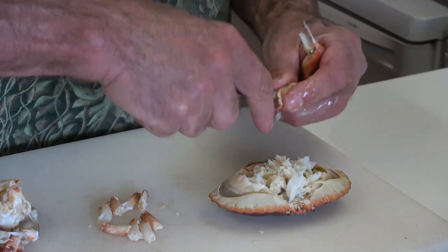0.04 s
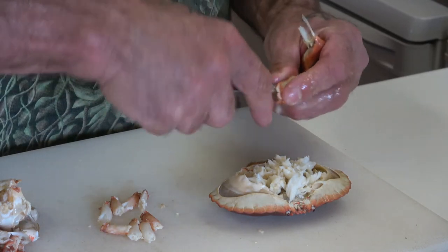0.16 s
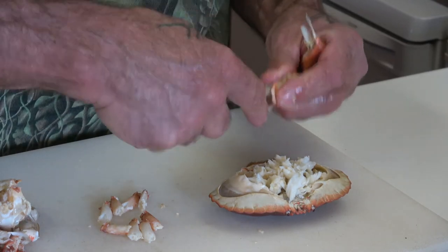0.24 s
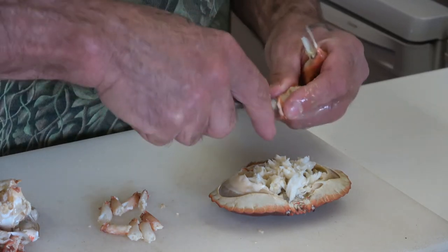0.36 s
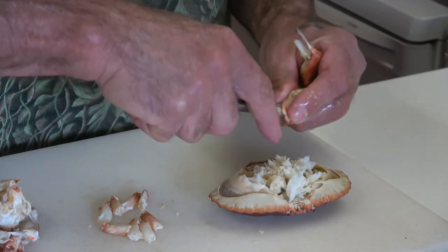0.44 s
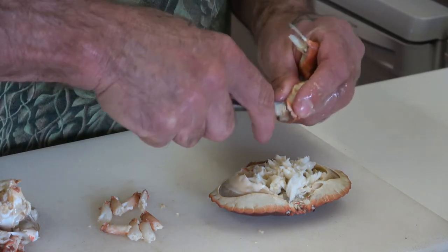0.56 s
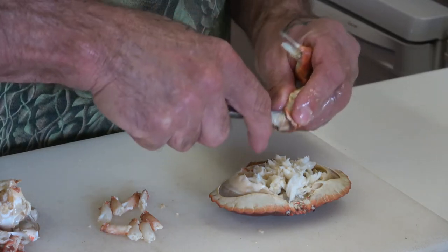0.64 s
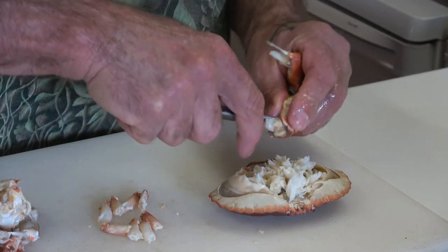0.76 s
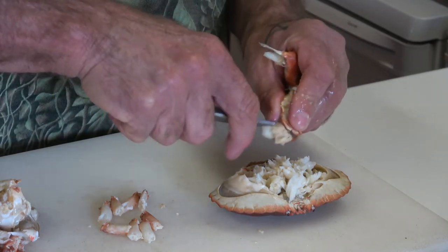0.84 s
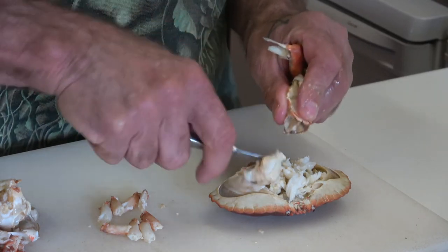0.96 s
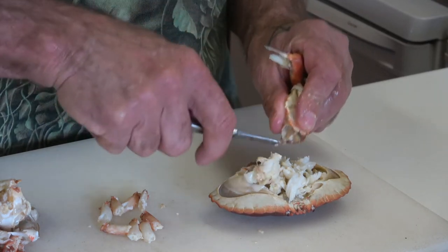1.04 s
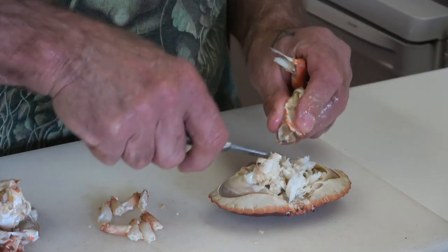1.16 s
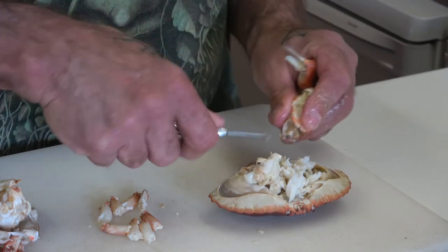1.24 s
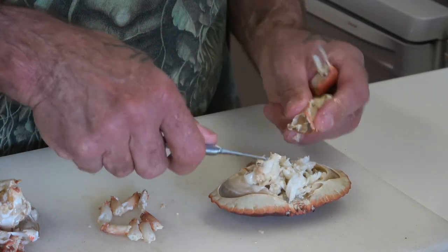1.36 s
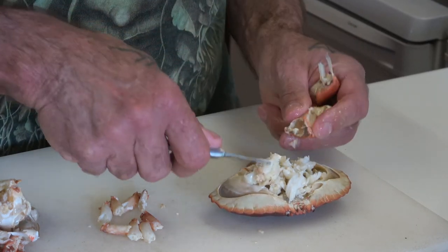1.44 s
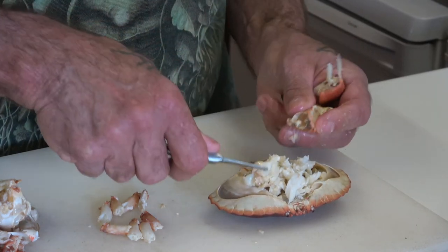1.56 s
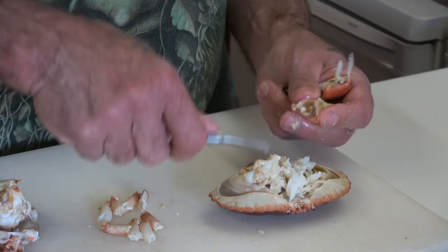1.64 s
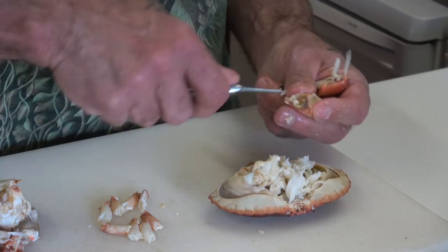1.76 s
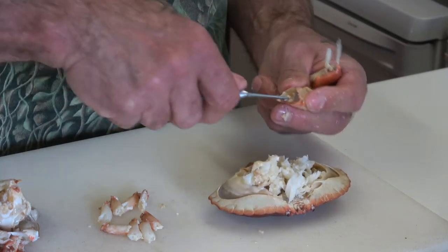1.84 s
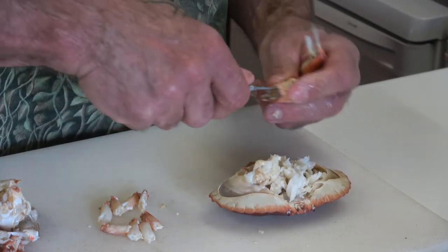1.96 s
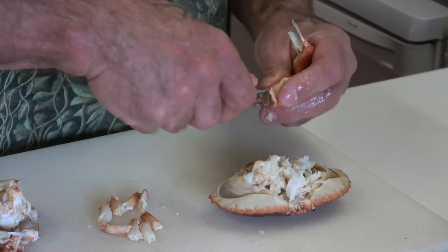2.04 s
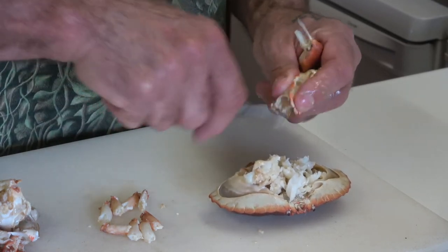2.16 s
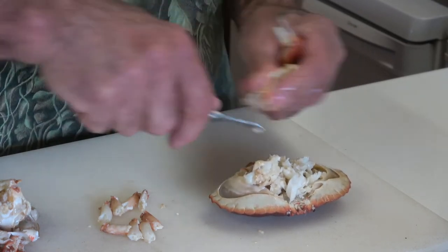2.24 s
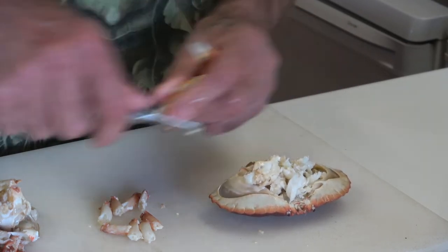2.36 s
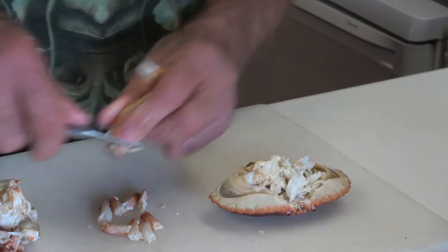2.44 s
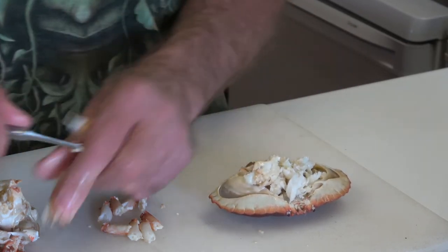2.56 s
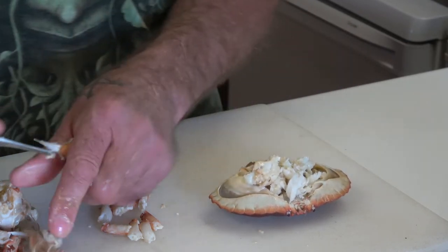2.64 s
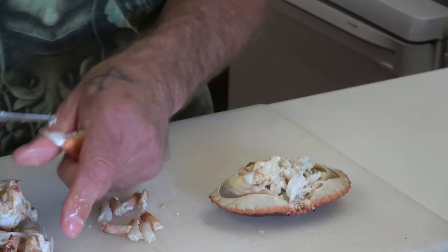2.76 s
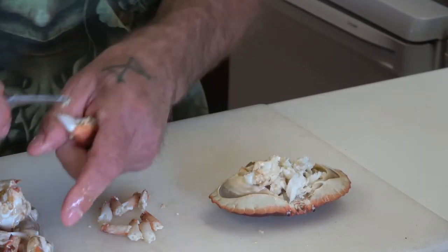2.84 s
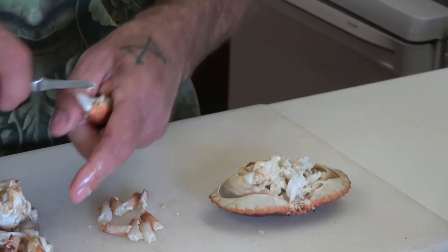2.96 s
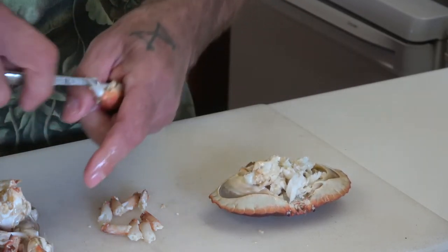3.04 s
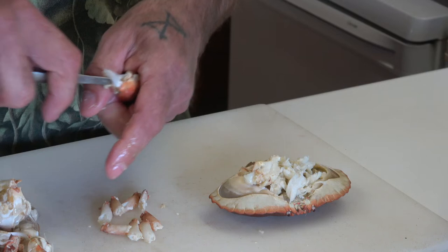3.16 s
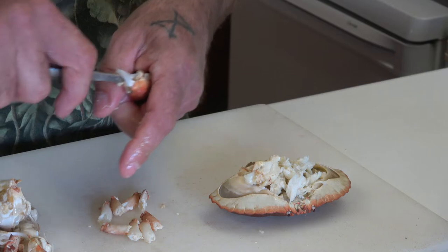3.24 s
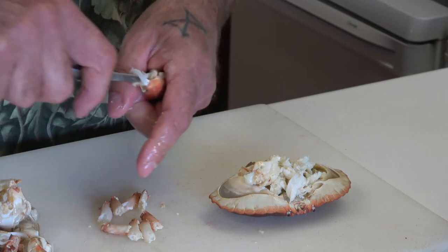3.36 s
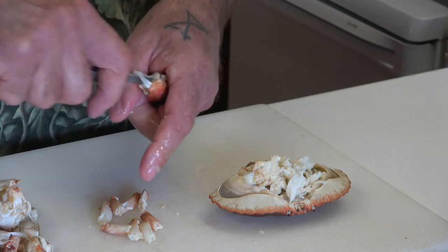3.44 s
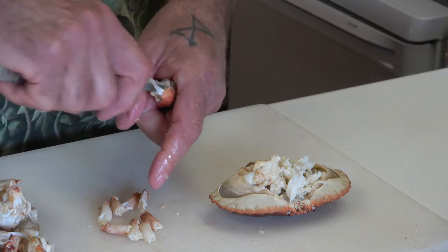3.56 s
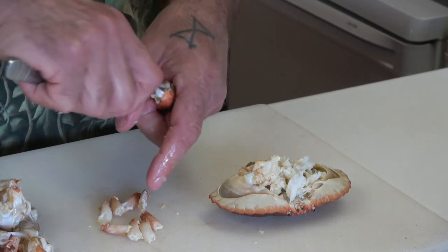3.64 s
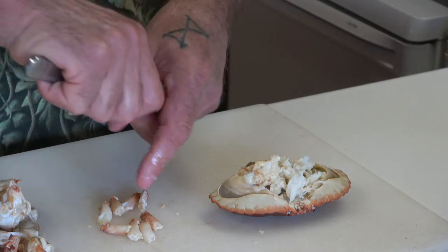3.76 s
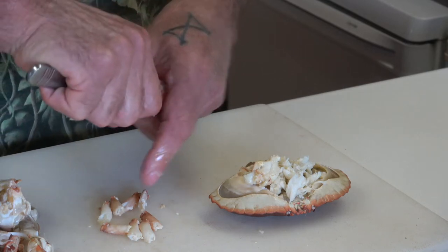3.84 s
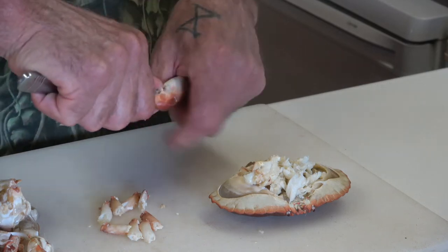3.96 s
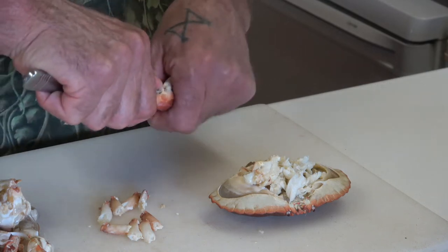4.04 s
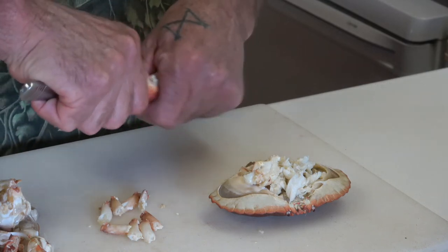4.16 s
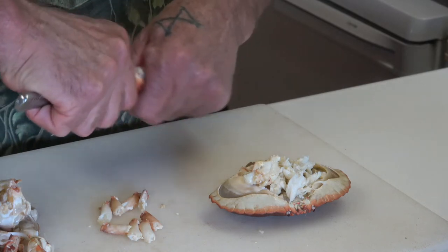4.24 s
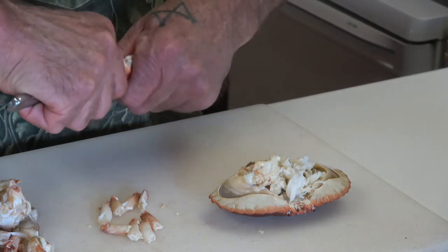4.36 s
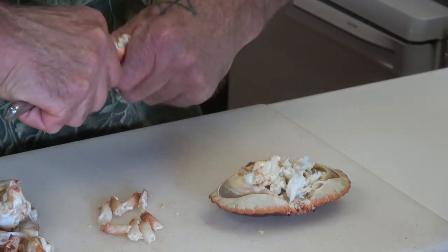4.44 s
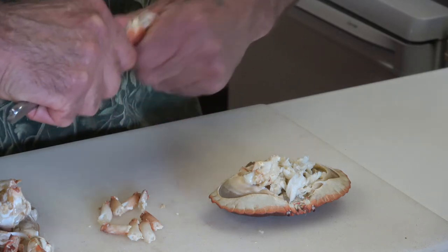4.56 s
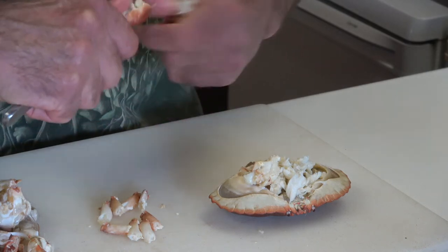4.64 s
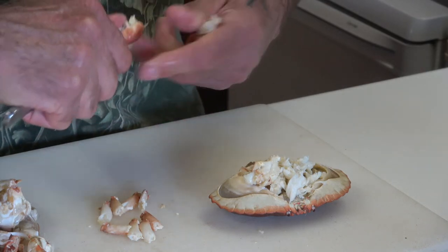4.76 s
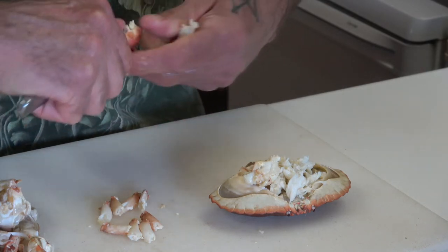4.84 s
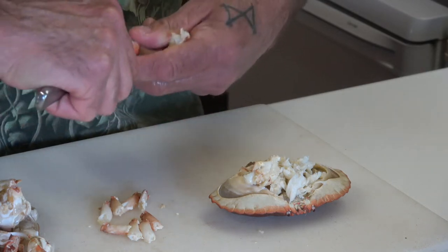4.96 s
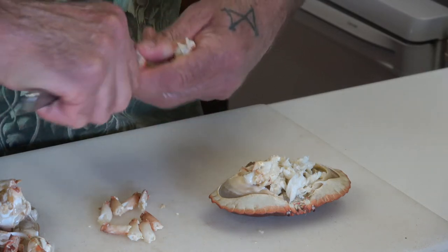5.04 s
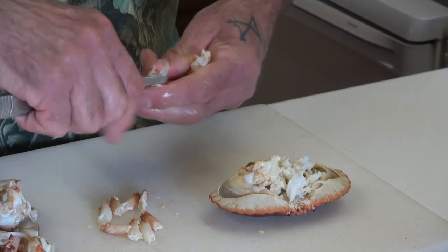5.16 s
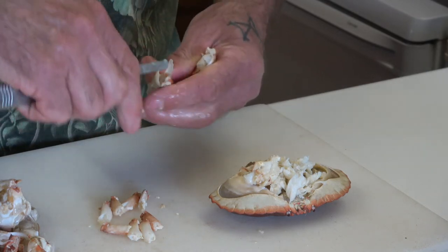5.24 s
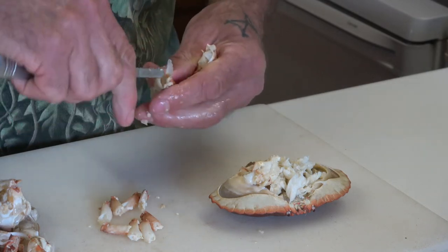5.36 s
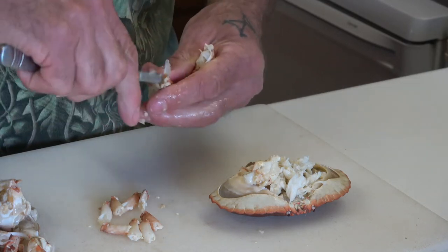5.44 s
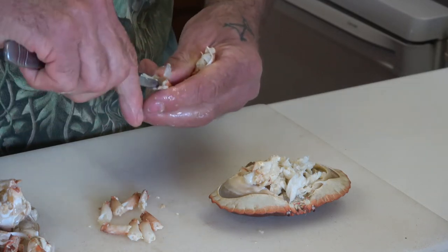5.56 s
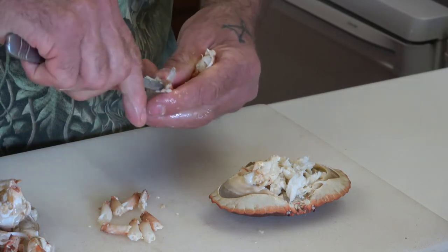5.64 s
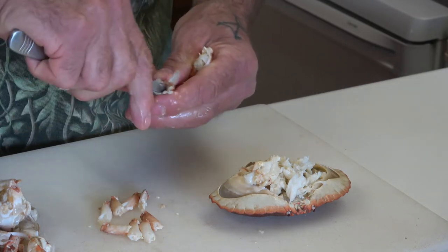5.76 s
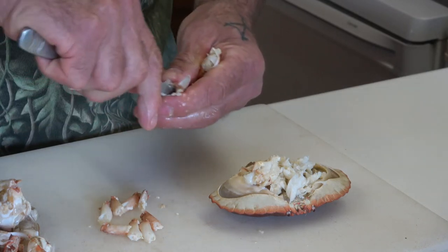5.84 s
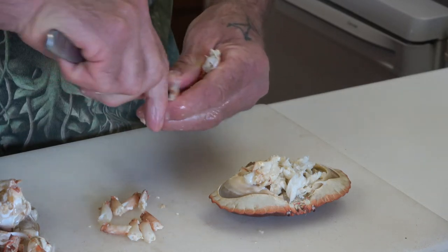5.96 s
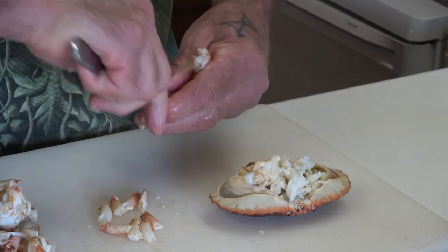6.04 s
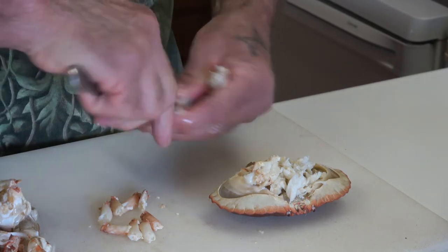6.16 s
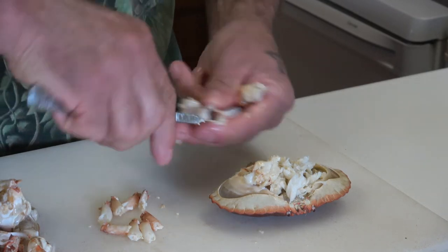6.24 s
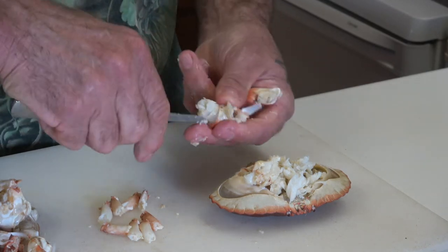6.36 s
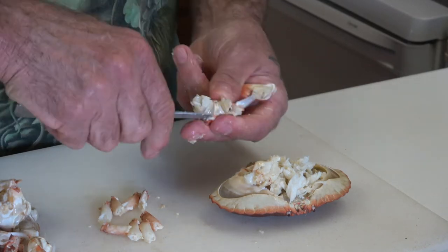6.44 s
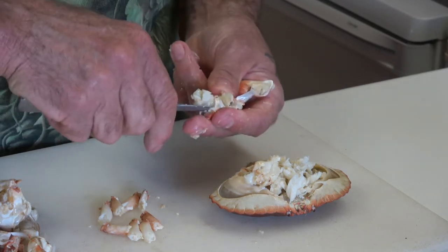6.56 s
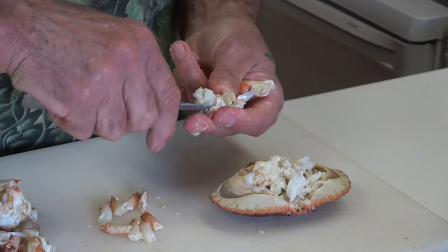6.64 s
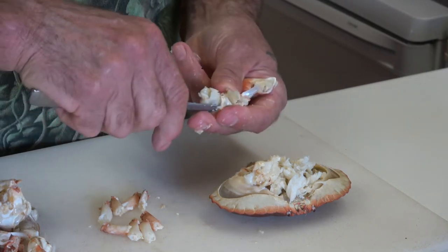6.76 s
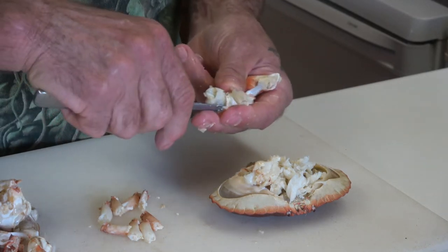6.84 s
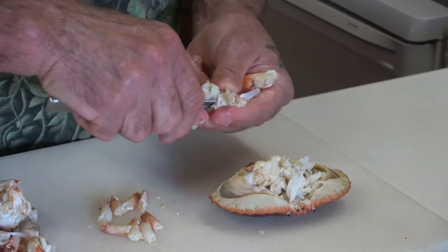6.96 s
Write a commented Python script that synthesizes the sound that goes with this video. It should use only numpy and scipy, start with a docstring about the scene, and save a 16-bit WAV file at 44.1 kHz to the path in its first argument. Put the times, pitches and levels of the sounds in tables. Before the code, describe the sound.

Close to one microphone in a small kitchen, a metal pick clicks and scrapes inside crab shell while fibres of meat pull loose with soft wet ticks. The shell snaps early on, a tossed piece knocks and tumbles on the cutting board, then comes one loud, bright crack and a few smaller crunches. An appliance hums faintly, and a distant rumble dies away in the first half.

```python
"""A metal pick works crab meat out of its shell over a cutting board, close to one microphone.
The shell clicks, scrapes, snaps and crunches, each freed piece ringing briefly at its own pitch.
Fibres of meat tick as they pull loose, and a tossed piece knocks down and tumbles to rest.
The place is a small kitchen with quick echoes and an appliance humming in the background.
Far off, a rumble and a roar die away, and one faint whistle rises and sinks."""
import sys
import numpy as np
from scipy import signal
from scipy.fft import rfft, irfft
from scipy.io import wavfile

SR = 44100
rng = np.random.default_rng(int(sys.argv[2]) if len(sys.argv) > 2 else 0)


def log_audio(samples):
    """Write samples as a 16-bit WAV file to the path given in sys.argv[1]."""
    # one column per channel
    frames = np.atleast_2d(samples).T
    # limit to full scale, then quantise
    limited = np.clip(frames, -1, 1)
    pcm = np.round(limited * 32767).astype(np.int16)
    wavfile.write(sys.argv[1], SR, pcm)


N = 308700
TIME = np.arange(N) / SR
RING_TIME = np.arange(1024) / SR  # the span of one crack or knock


def gain_of(db):
    """Decibels to amplitude."""
    return 10 ** (np.asarray(db) / 20)


def unit(x):
    """Scales to energy 1."""
    return x / np.sqrt(np.sum(x ** 2) + 1e-20)


def value_at(points, hz):
    """Joins points on a log-frequency axis."""
    point_hz, value = np.transpose(points)
    return np.interp(np.log(hz + 1), np.log(point_hz + 1), value)


def curve(points):
    """Joins points in time, at every sample."""
    return np.interp(TIME, *np.transpose(points))


def add(mix, start_s, sound):
    """Mixes a sound in at its start time."""
    part = mix[max(round(start_s * SR), 0):][:len(sound)]
    part += sound[:len(part)]


def noise(spectrum):
    """Noise of rms 1 with the given spectrum."""
    gain = gain_of(value_at(spectrum, np.fft.rfftfreq(N, 1 / SR)))
    return np.sqrt(N) * unit(irfft(rfft(rng.standard_normal(N)) * gain, N))


def drift(rate_hz):
    """A slow random wander of rms 1."""
    lowpass = np.exp(-(np.fft.rfftfreq(N, 1 / SR) / rate_hz) ** 2)
    return np.sqrt(N) * unit(irfft(rfft(rng.standard_normal(N)) * lowpass, N))


# The kitchen's room tone. Each row: frequency in Hz, relative density in dB.
AIR_SPECTRUM = [(12, -5), (20, -2.5), (55, 1.5), (81, -12), (248, -16.5), (270, -19), (301, -19.5),
                (459, -16), (499, -25), (542, -15), (678, -21.5), (1000, -24.5), (1710, -25.5), (4180, -34),
                (16000, -38)]

def room_air(db=-53):
    """Steady, dull noise of the air around the microphone."""
    return gain_of(db) * noise(AIR_SPECTRUM)


# An appliance in the background. Each row: frequency in Hz, rms level in dB before the trim.
HUM_TONES = [(48.4, -57.5), (156.1, -67.5), (247.6, -69), (301.5, -65), (468.3, -69), (543.7, -68.5),
             (592.2, -70), (990.5, -72)]

def appliance_hum(trim_db=-2, waver_hz=1.537):
    """Low tones, each wavering in pitch on its own."""
    out = np.zeros(N)
    for hz, db in HUM_TONES:
        cycles = hz * TIME + waver_hz * np.cumsum(drift(6.03)) / SR
        out += gain_of(db + trim_db) * np.sqrt(2) * np.sin(2 * np.pi * cycles)
    return out


# The rumble, far from the microphone. Each row: frequency in Hz, relative density in dB.
RUMBLE_SPECTRUM = [(20, -14), (50, 1), (90, 1.5), (150, -3), (230, -6), (320, -22), (600, -47), (2000, -60)]
# Its rise and fade. Each row: time in seconds, base level in dB.
RUMBLE_LEVELS = [(0, -49.5), (.4, -50), (.7, -42.5), (1.1, -47.5), (2.5, -49.5), (2.9, -56.5), (4.5, -63),
                 (7, -67.5)]
# Its brief swells. Each row: centre in seconds, half length in seconds, rise in dB.
RUMBLE_SWELLS = [(0, 0.054, 7.5), (0.531, 0.032, 11), (0.659, 0.039, 8.5), (1.497, .09, 4.5)]

def distant_rumble(lump_db=2):
    """Deep, lumpy noise that peaks early and dies away."""
    swell_db = sum(db * np.exp(-((TIME - s) / half_s) ** 2) for s, half_s, db in RUMBLE_SWELLS)
    return noise(RUMBLE_SPECTRUM) * gain_of(curve(RUMBLE_LEVELS) + swell_db + lump_db * drift(19))


# The far roar above the rumble. Each row: frequency in Hz, relative density in dB.
ROAR_SPECTRUM = [(100, 10), (300, -4.5), (600, 0.5), (1000, 5.5), (1400, -3.5), (2000, -14.5), (4000, -27),
                 (9000, -34.5), (16000, -47.5)]
# Its rise and fade. Each row: time in seconds, level in dB.
ROAR_LEVELS = [(0, -48), (.6, -45.5), (1.1, -49), (2.4, -50.5), (3, -59.5), (7, -61.5)]

def distant_roar():
    """Broader noise that fades along with the rumble."""
    return gain_of(curve(ROAR_LEVELS)) * noise(ROAR_SPECTRUM)


def ring(modes, scale, scatter=0.012, rise_cycles=1.1):
    """Damped modes of energy 1 in all that swell in about a cycle; no two blows land quite alike."""
    out = 0
    for pitch, width_hz, db in modes:
        cycles = pitch * scale * (1 + scatter * rng.standard_normal()) * RING_TIME
        envelope = (1 - np.exp(-cycles / rise_cycles)) * np.exp(-np.pi * width_hz * RING_TIME)
        out += rng.choice([-1, 1]) * gain_of(db) * unit(np.sin(2 * np.pi * cycles) * envelope)
    return unit(out)


# The modes of a piece of shell. Each row: multiple of its pitch, width in Hz, relative level in dB.
SHELL_RESONANCES = [(.94, 300, -0.5), (1.05, 260, 3), (1.7, 400, -14), (2.2, 800, -23), (3.05, 1100, -19.5)]

def shell_ring(hz):
    """A piece of shell rings for a few milliseconds."""
    return ring(SHELL_RESONANCES, hz)


# The break itself, heard close. Each row: frequency in Hz, relative density in dB.
FRACTURE_SPECTRUM = [(100, -26), (600, -13.5), (1000, -6.5), (1500, -11), (2500, -1), (3500, -2.5),
                     (4800, 3), (6500, 0), (8000, 1), (10500, -3), (13000, -1), (16000, -8.5)]

def fracture(corner_hz, tear_s=0.00076, tear_db=1, fall_db_per_octave=21):
    """A sharp break, then a brief tear; the harder its edge, the higher its treble corner."""
    hz = np.fft.rfftfreq(len(RING_TIME), 1 / SR)
    octaves_above = np.log2(np.maximum(hz / corner_hz, 1))
    gain = gain_of(value_at(FRACTURE_SPECTRUM, hz) - fall_db_per_octave * octaves_above)
    log_gain = np.log(np.r_[gain, gain[-2:0:-1]])
    minimum_phase = np.exp(np.conj(signal.hilbert(log_gain)))[:len(hz)]  # keeps the onset sharp
    tear = gain_of(tear_db) * unit(rng.standard_normal(len(RING_TIME)) * np.exp(-RING_TIME / tear_s))
    impulse = rng.choice([-1, 1])
    return unit(irfft((impulse + rfft(tear)) * minimum_phase))


# Spells of digging in the meat. Each row: start in seconds, end in seconds, mean ticks per second.
DIGGING_SPELLS = [(0, 1.05, 70), (3.65, 5.3, 142), (5.9, 7, 85)]

def meat_ticks(db=-52, spread_db=4, idle_ticks_per_s=25):
    """Soft wet ticks as fibres of meat pull loose, slower than a crack in the shell."""
    ticks_per_s = np.full(N, float(idle_ticks_per_s))
    for start_s, end_s, rate in DIGGING_SPELLS:
        ticks_per_s[(TIME >= start_s) & (TIME < end_s)] = rate
    out = np.zeros(N)
    for start_s in TIME[rng.random(N) < ticks_per_s / SR]:
        tick = shell_ring(hz=rng.uniform(2380, 4300))
        tick += fracture(corner_hz=10000, tear_s=0.0017, tear_db=9)
        add(out, start_s, gain_of(db + spread_db * rng.standard_normal()) * tick)
    return out


def crack(ring_db, hz, fracture_over_db, corner_hz):
    """A fracture and the ring of the piece that it sets free."""
    return gain_of(ring_db) * (shell_ring(hz) + gain_of(fracture_over_db) * fracture(corner_hz))


# The pick meets shell, near the microphone. Each row: start in seconds, contact energy in dB,
# ring pitch in Hz, ring over contact in dB.
PICK_CLICKS = [(0.3667, -29, 2400, 2), (1.4484, -23, 3430, -2.5), (1.739, -38, 3400, 10.5),
               (1.9162, -16.5, 2430, 1), (1.9805, -1, 2590, -5), (3.6767, -44, 4040, 11),
               (4.4578, 3.5, 2250, -7), (4.6392, -25.5, 2820, 3), (5.968, -35, 3000, -1),
               (6.009, -29.5, 4400, 1)]

def pick_clicks(corner_hz=6550):
    """Metal taps the shell and sets it ringing, duller than a snap."""
    out = np.zeros(N)
    for start_s, db, hz, ring_over_db in PICK_CLICKS:
        add(out, start_s, crack(db + ring_over_db, hz, -ring_over_db, corner_hz))
    return out


# Scrapes, mostly the pick slipping along the shell; the row at 2.723 s is a tossed piece skidding on the board,
# the one at 1.45 s a soft hiss of meat wiped off the pick. Each row: start in seconds, length in seconds, rms
# level in dB, # ring pitch in Hz, fracture over ring in dB, treble corner in Hz.
SCRAPES = [(.411, .024, -37, 2650, 8, 9500), (.591, .022, -49, 4700, 12, 11000),
           (0.868, .05, -56.5, 2580, -1, 10000), (1.45, .23, -66, 3800, 6, 5170),
           (1.993, .04, -43, 2820, -12, 7200), (2.051, .037, -47.5, 2820, -2, 9000),
           (2.146, .1, -44, 2720, -2, 8500), (2.723, .028, -28.5, 2930, -5, 5400),
           (4.316, 0.0096, -36.5, 1670, 2, 13000), (4.358, .052, -56, 2470, -3, 14000),
           (4.463, 0.053, -25.5, 2400, -8, 11000), (4.633, .043, -47, 3030, 8, 6500),
           (5.784, .032, -59, 3000, 6, 10500), (5.98, .15, -58.5, 3200, 1, 6000),
           (6.035, .03, -47.5, 4000, -9, 5200), (6.208, .016, -53, 3450, 2, 9000),
           (6.249, .012, -50.5, 3820, 7, 9500), (6.949, .045, -44, 4100, 0, 7200)]

def scrapes(slips_per_s=900, spread_db=3):
    """Dense runs of tiny cracks that swell and fade, mostly the pick slipping along the shell."""
    out = np.zeros(N)
    for start_s, length_s, db, *timbre in SCRAPES:
        slips = max(int(length_s * slips_per_s), 2)
        stroke = np.zeros(int(length_s * SR) + len(RING_TIME))
        for progress in (np.arange(slips) + rng.random(slips)) / slips:
            swell = np.sqrt(np.sin(np.pi * progress))
            add(stroke, progress * length_s, swell * crack(spread_db * rng.standard_normal(), *timbre))
        add(out, start_s, gain_of(db) * np.sqrt(length_s * SR) * unit(stroke))
    return out


# Shell breaking at close range. Each row: start in seconds, ring energy in dB, ring pitch in Hz,
# fracture over ring in dB, treble corner in Hz.
SHELL_SNAPS = [(0.414, -10.5, 2650, -1, 7500), (0.4287, -.3, 2560, -3, 9000),
               (0.4742, -7, 2540, -2.5, 9000), (0.8677, -23, 2850, -1.5, 9000),
               (0.9634, -6.5, 2045, -15.5, 10000), (2.0773, -16, 2730, -1.5, 10000),
               (2.2367, -17, 2730, -6, 9500), (2.4552, -39, 2700, 6, 9000), (4.0868, -40, 2700, 7, 9000),
               (4.4599, 11.3, 2450, -1, 16000), (5.937, -33, 2650, -3, 10000), (6.21, -30, 3080, -6, 10500),
               (6.2552, -33, 3800, 1, 10000), (6.9739, -14, 3980, 2, 7000)]

def shell_snaps():
    """The shell gives in single cracks, sharp and bright."""
    out = np.zeros(N)
    for start_s, db, *timbre in SHELL_SNAPS:
        add(out, start_s, crack(db, *timbre))
    return out


def far_whistle(start_s=1.38, length_s=.34, db=-70, low_hz=5700, top_hz=6320, skew=.55):
    """A thin, faint tone that rises quickly and sinks slowly."""
    progress = np.clip((TIME - start_s) / length_s, 0, 1)
    arch = np.sin(np.pi * progress ** skew)
    hz = low_hz + (top_hz - low_hz) * arch
    return gain_of(db) * np.sqrt(2 * abs(arch)) * np.sin(2 * np.pi * np.cumsum(hz) / SR)


# The modes of a knock. Each row: base frequency in Hz, width in Hz, relative level in dB.
KNOCK_RESONANCES = [(240, 180, -18.5), (400, 113, -11), (700, 300, -5.5), (1050, 380, 4.5), (1350, 940, -1),
                    (1700, 260, -8), (2190, 480, -4.5), (2455, 240, -9), (3210, 260, -8.5),
                    (4460, 240, -12), (5450, 180, -36), (7400, 1400, -27), (10600, 2200, -21.5)]
# Blunt knocks of shell and pick; some sound in the held shell along with a pick click. Each row: start in
# seconds, energy in dB, pitch factor, bounces (none below 1).
KNOCKS = [(1.7382, -17.5, 1.08, -0.5), (1.9167, -19, .85, 0), (2.2015, -20, .9, 0), (2.6038, -16.5, .85, 0),
          (2.7258, 11, 1.094, 4), (3.6767, -20.5, 1.31, -0.5), (6.0455, -26, .9, 0),
          (6.9739, -23.5, 1.15, 0)]

def knocks(gap_s=.025, first_bounce_db=-14.5, loss_db=6.5, pitch_spread=.17):
    """Blunt blows of shell and pick; a tossed piece bounces ever more weakly, on another side each time."""
    out = np.zeros(N)
    for start_s, db, pitch, bounces in KNOCKS:
        add(out, start_s, gain_of(db) * ring(KNOCK_RESONANCES, pitch))
        for k, turn in enumerate(rng.standard_normal(round(bounces))):
            bounce = ring(KNOCK_RESONANCES, pitch * (1 + pitch_spread * turn))
            add(out, start_s + (k + 1) * gap_s, gain_of(db + first_bounce_db - loss_db * k) * bounce)
    return out


# Shell crushed near the microphone. Each row: start in seconds, number of cracks, ring energy of the
# last in dB, ring pitch in Hz, fracture over ring in dB, treble corner in Hz.
SHELL_CRUNCHES = [(2.1712, 5, -10, 2550, -2, 8700), (4.2703, 3, -17.5, 2650, -4, 11000),
                  (4.313, 3, -18.5, 2520, 0, 14000), (6.0376, 3, -14, 3850, -10, 5170),
                  (6.9588, 2, -25, 4080, -3, 7000)]

def shell_crunches(gap_s=.0075, jitter_s=.0002, growth_db=1.2, pitch_spread=.04):
    """Cracks follow one another at a nearly even pace and grow until the piece gives."""
    out = np.zeros(N)
    for start_s, cracks, last_db, hz, *edge in SHELL_CRUNCHES:
        for k, (late, detune) in enumerate(rng.standard_normal((cracks, 2))):
            db = last_db - growth_db * (cracks - 1 - k)
            crack_s = start_s + k * gap_s + jitter_s * late
            add(out, crack_s, crack(db, hz * (1 + pitch_spread * detune), *edge))
    return out


# Board, counter and wall throw sound back to the microphone. Each row: delay in seconds, level in dB.
KITCHEN_ECHOES = [(.0009, -17), (.0051, -16), (.0074, -21), (0.0115, -16.5), (0.0195, -22.5),
                  (.0252, -20.5)]
# The small room's decay. Each row: frequency in Hz, time to fall 60 dB in seconds.
TAIL_DECAY = [(200, 0.23), (1000, 0.29), (2500, 0.22), (6000, 0.24), (14000, 0.19)]
# The tail's strength. Each row: frequency in Hz, level against the direct sound in dB.
TAIL_LEVELS = [(200, -7.5), (1000, -5.5), (2500, -8.5), (6000, -6.5), (14000, -8.5)]

def kitchen(sound, build_s=0.0018):
    """Direct sound, a few hard echoes, and a short tail that dies band by band."""
    hz, t, bands = signal.stft(rng.standard_normal(SR // 2), SR, nperseg=256)
    decay_per_s = np.log(1000) / value_at(TAIL_DECAY, hz)[:, None]
    gain = gain_of(value_at(TAIL_LEVELS, hz))[:, None] * np.sqrt(2 * decay_per_s / SR)
    response = signal.istft(bands * gain * np.exp(-decay_per_s * t), SR, nperseg=256)[1]
    response *= 1 - np.exp(-(TIME[:len(response)] / build_s) ** 2)
    response[0] += 1  # the direct path
    for delay_s, db in KITCHEN_ECHOES:
        add(response, delay_s, gain_of([db]))
    return signal.fftconvolve(sound, response)[:N]


def scene():
    """The work at the board and the background, from one spot in the kitchen."""
    background = room_air() + appliance_hum() + distant_rumble() + distant_roar()
    work = meat_ticks() + pick_clicks() + scrapes() + shell_snaps() + knocks() + shell_crunches()
    return (kitchen(work + far_whistle()) + background)[None]


def record(dry, ceiling=0.6, cutoff_hz=16100):
    """The microphone's mono channel: the loudest peaks are rounded off, then the top treble is cut."""
    rounded = ceiling * np.tanh(dry / ceiling)
    lowpass = signal.firwin(511, cutoff_hz, window=("kaiser", 9), fs=SR)
    return signal.oaconvolve(rounded, lowpass[None], "same")


dry = scene()
out = record(dry)
log_audio(out)
```